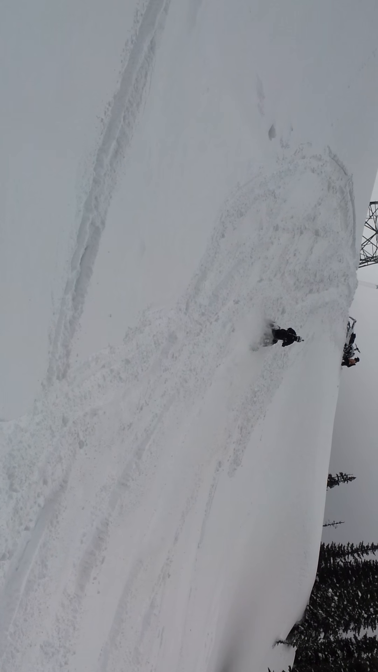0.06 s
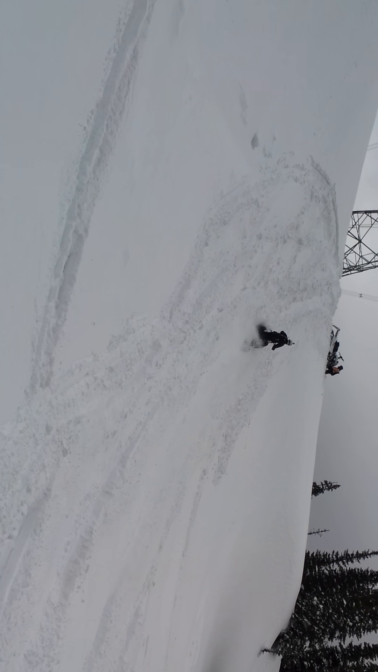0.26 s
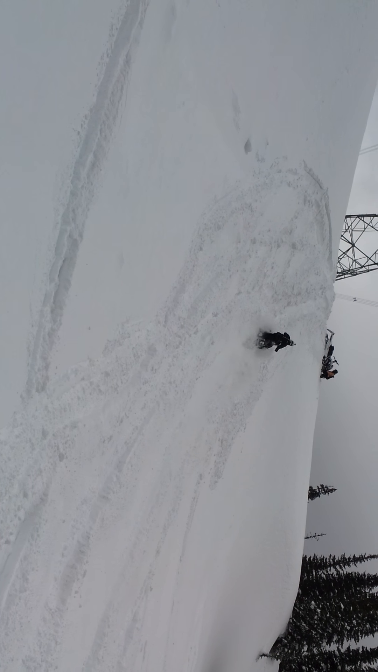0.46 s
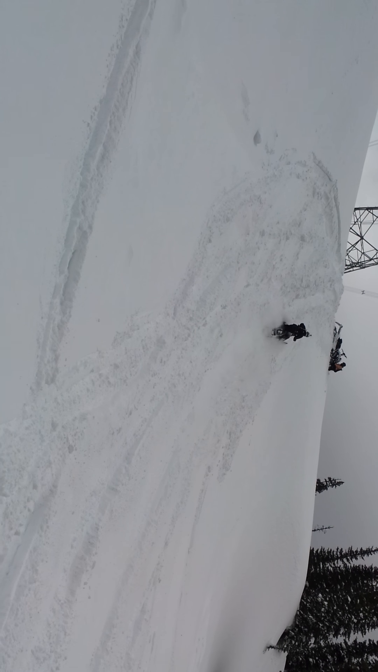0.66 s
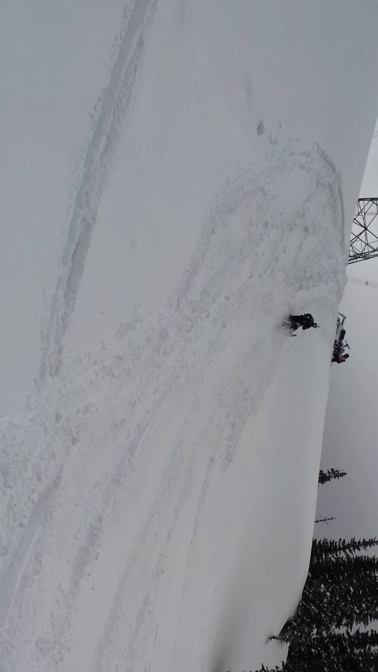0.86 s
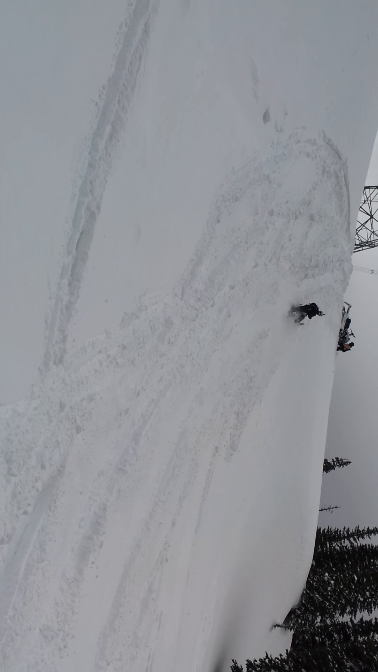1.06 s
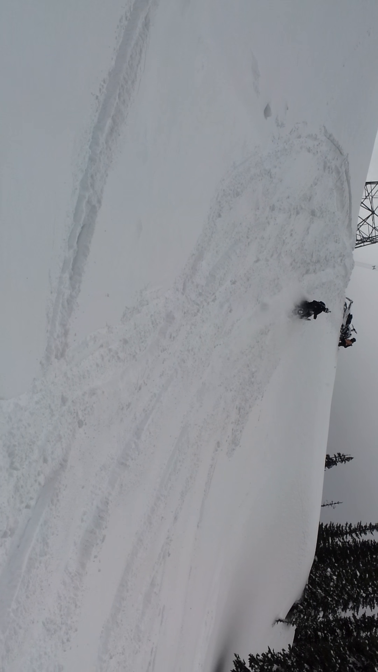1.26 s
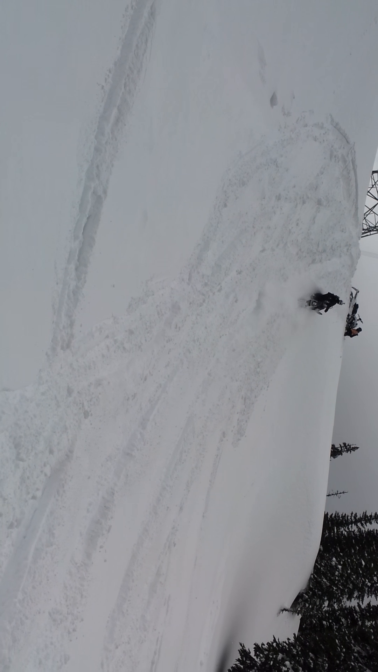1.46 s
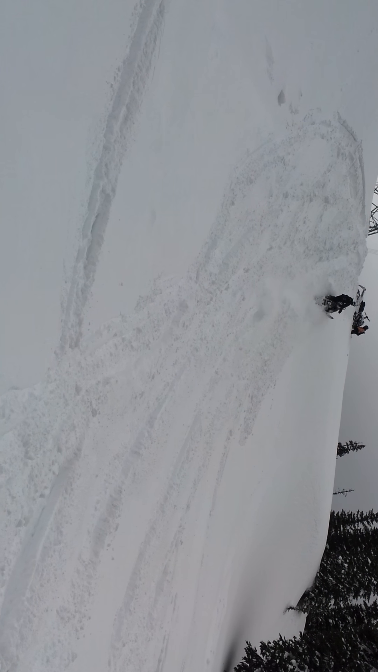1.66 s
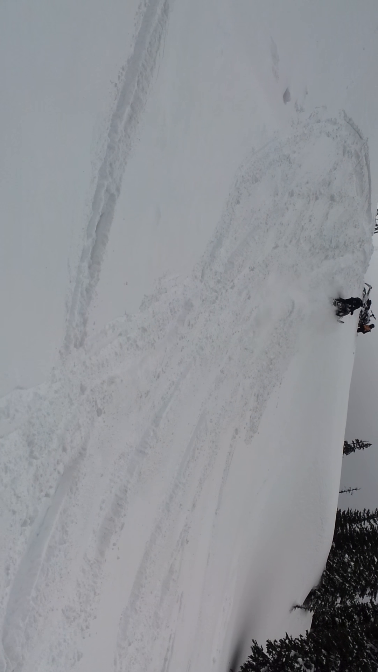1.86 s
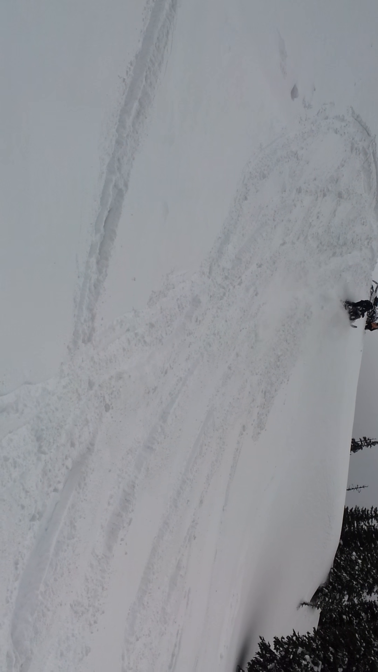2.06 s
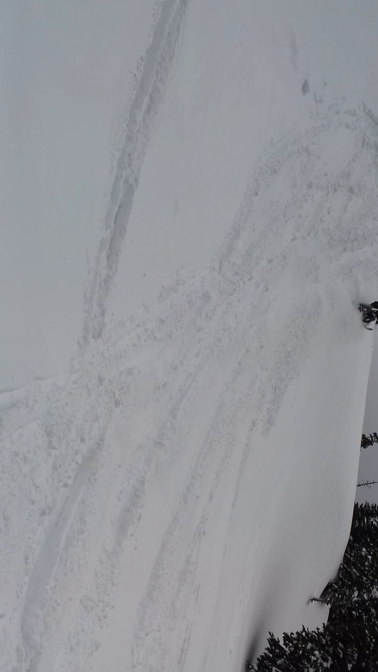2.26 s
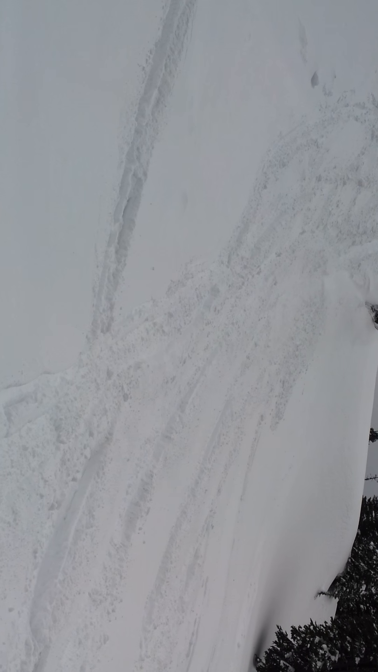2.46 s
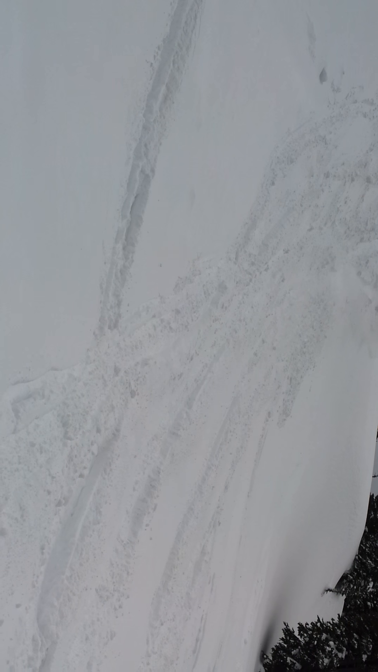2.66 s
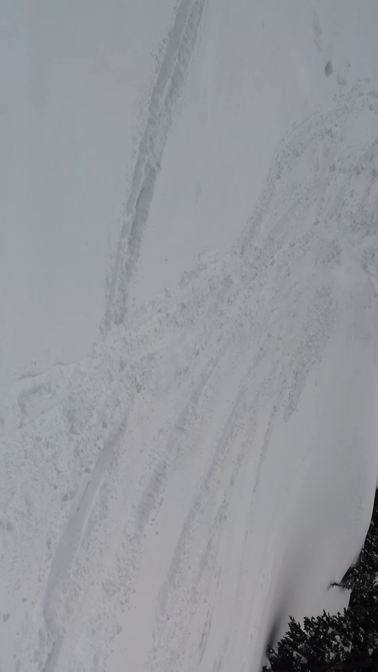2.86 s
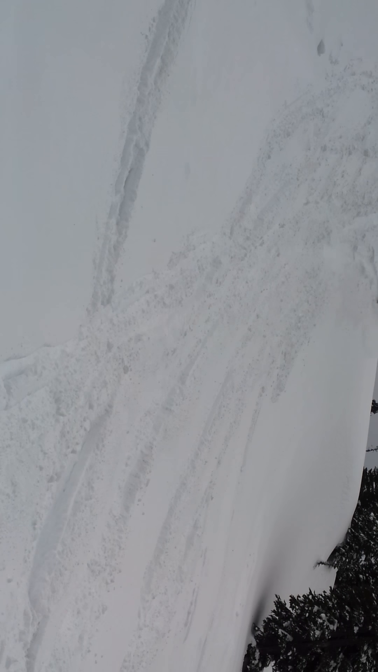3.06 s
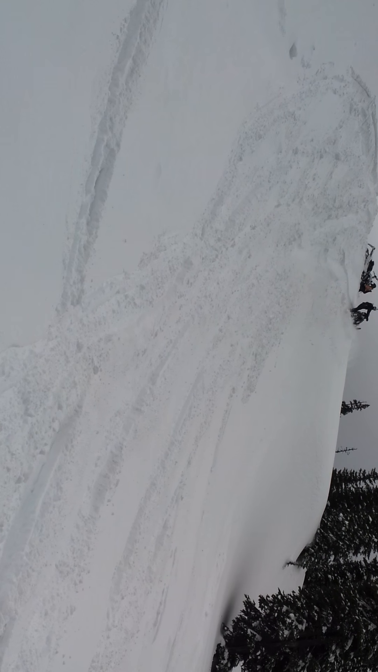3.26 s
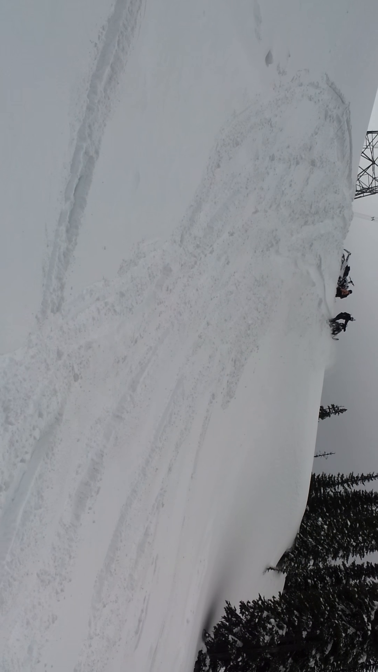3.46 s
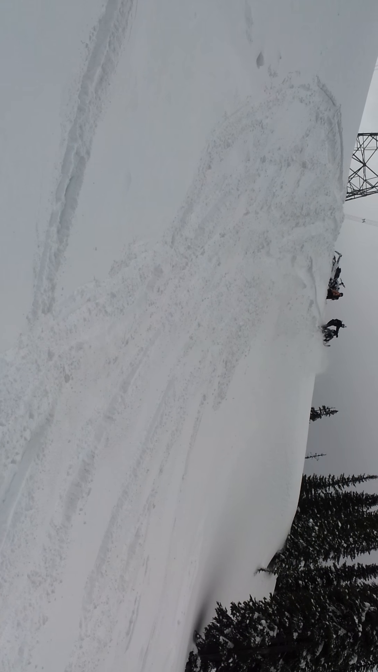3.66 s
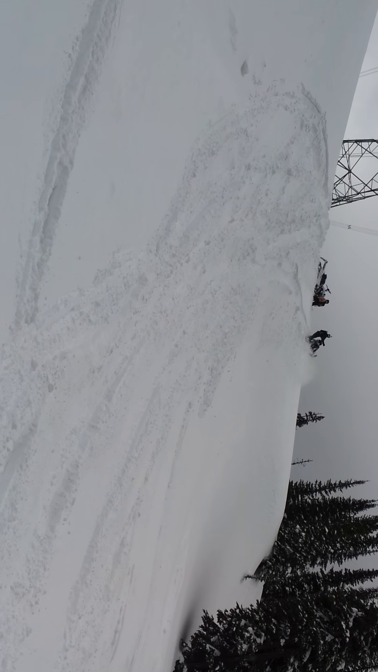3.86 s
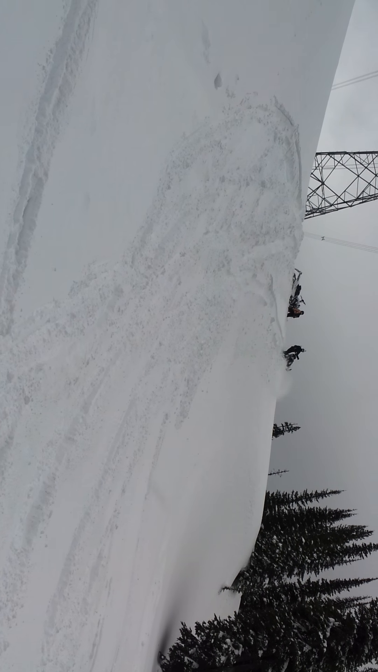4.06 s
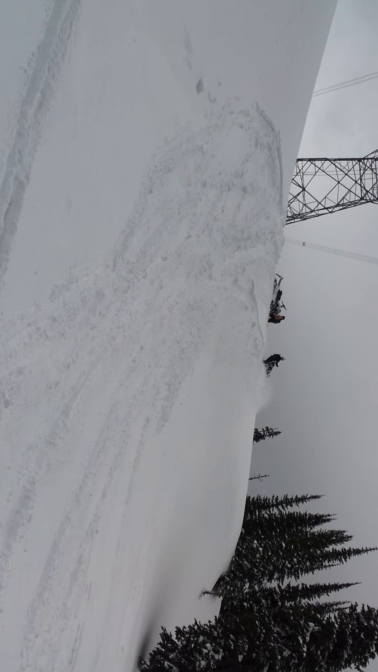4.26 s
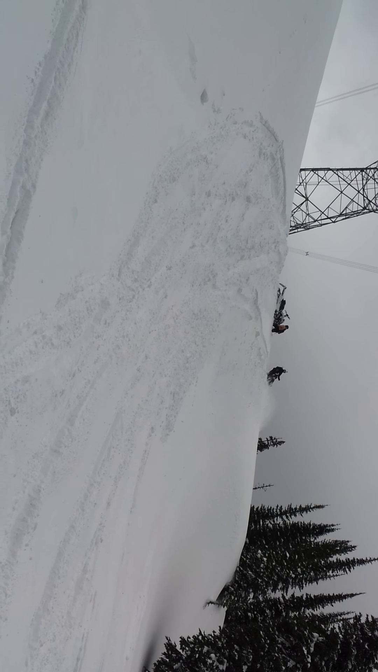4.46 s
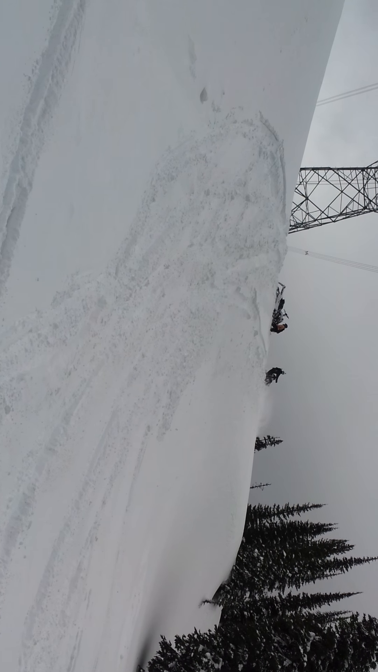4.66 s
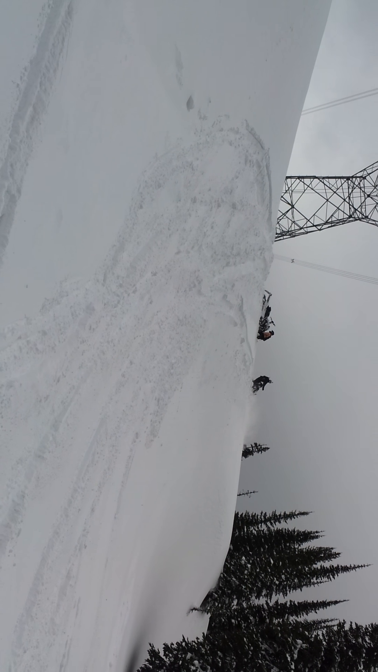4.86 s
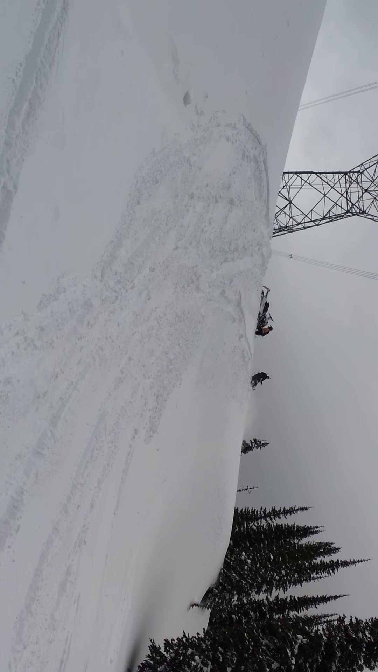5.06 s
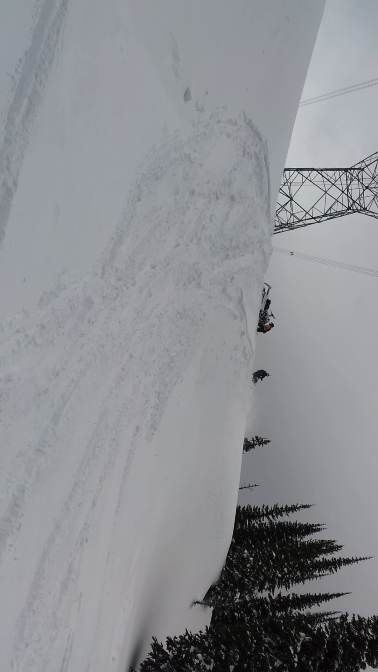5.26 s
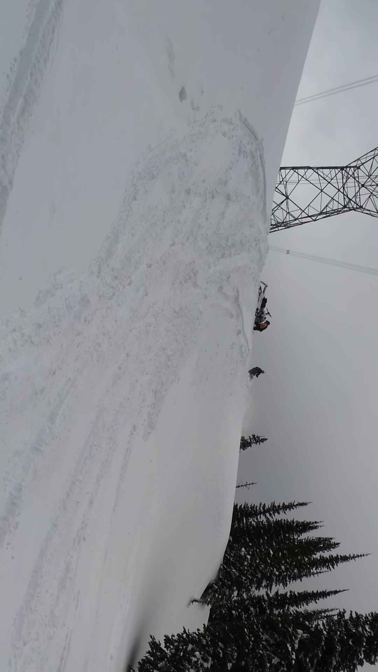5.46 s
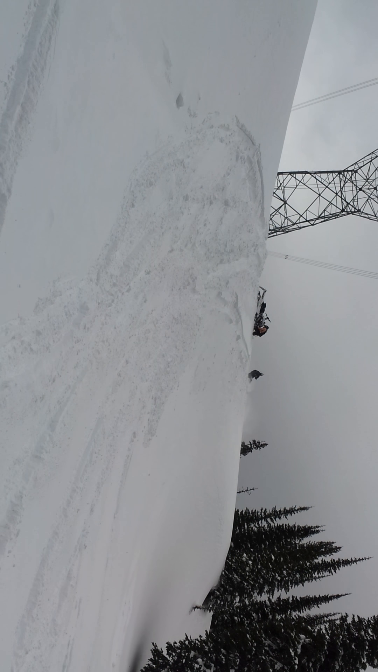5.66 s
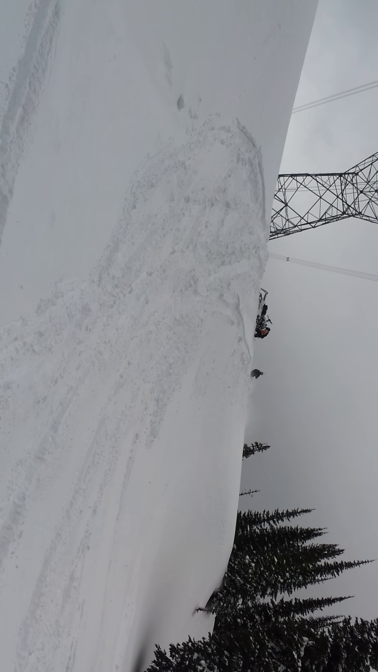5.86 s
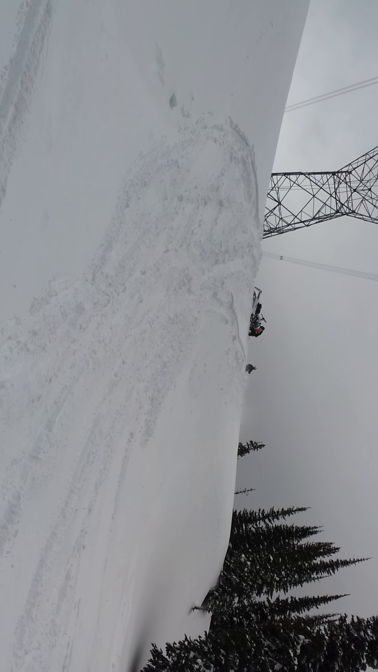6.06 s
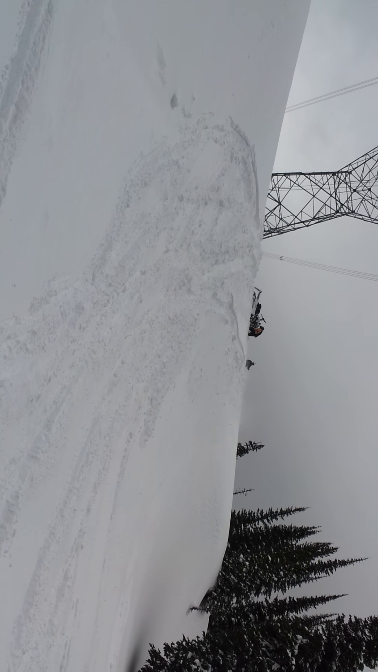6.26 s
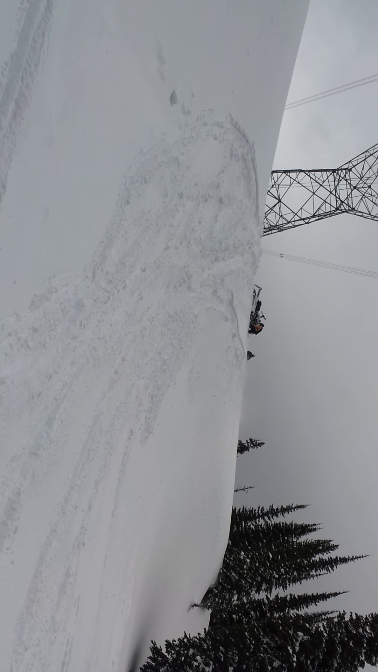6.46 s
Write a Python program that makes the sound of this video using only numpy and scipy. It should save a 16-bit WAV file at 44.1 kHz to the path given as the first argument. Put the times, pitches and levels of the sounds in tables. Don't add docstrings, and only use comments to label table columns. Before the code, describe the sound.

A high-revving snowmobile buzzes and roars as it climbs away from a handheld microphone. Loud, rough swells with hissing snow and a humming track fill the first three seconds; afterwards the note thins, flutters and sinks into distance, trailed by its hillside reflection. Underneath sit a steady low idle from a nearby parked machine and lumpy wind buffeting, heaviest at the start.

```python
import sys
import numpy as np
from scipy import signal
from scipy.fft import rfft, irfft, next_fast_len
from scipy.io import wavfile
from scipy.ndimage import uniform_filter1d, map_coordinates

SR = 44100
rng = np.random.default_rng(int(sys.argv[2]) if len(sys.argv) > 2 else 0)


def attenuation_scalar(level_db):
    decades = np.asarray(level_db, float) / 20
    return 10 ** decades


def generate_wav(signal):
    frames = np.transpose(np.atleast_2d(signal))
    scaled = np.clip(frames, -1, 1) * 32767
    pcm = np.round(scaled).astype(np.int16)
    wavfile.write(sys.argv[1], SR, pcm)


N = 287532
TIME = np.arange(N) / SR


def unit(x):
    return x / np.sqrt(np.mean(x ** 2) + 1e-20)


def curves(rows):
    s, *columns = np.transpose(rows)
    return [np.interp(TIME, s, column) for column in columns]


def wobble(rate):
    return map_coordinates(rng.standard_normal(int(N * rate / SR) + 4), [TIME * rate])


def coloured(x, spectrum):
    size = next_fast_len(N + 8192)
    f, db = np.transpose(spectrum)
    gain = attenuation_scalar(np.interp(np.log(np.fft.rfftfreq(size, 1 / SR) + 1), np.log(f + 1), db))
    return irfft(rfft(x, size) * gain, size)[:N]


def patchy(depth_db):
    z = signal.stft(rng.standard_normal(N), nperseg=512)[2]
    field = uniform_filter1d(rng.standard_normal(z.shape), size=5, axis=0)
    field = uniform_filter1d(field, size=12, axis=1)
    return signal.istft(z * attenuation_scalar(depth_db * unit(field)), nperseg=512)[1][:N]


def partial(phase, order, db, flutter_db, smear):
    shake_db = flutter_db * (wobble(5) + 1.09 * wobble(22.156))
    shake_phase = smear * (wobble(8) + .5 * wobble(40))
    lag = 0.057 * order ** 2
    return np.sqrt(2) * attenuation_scalar(db + shake_db) * np.cos(order * phase - lag + shake_phase)


# (t/s, level/dB)
LOUDNESS = [(0.0, -29), (0.45, -39.5), (0.89, -31.5), (1.13, -29.5), (1.41, -37), (1.85, -30),
            (2.29, -37.5), (2.61, -28.5), (2.77, -28.5), (3.05, -32), (3.33, -38.5), (3.97, -35),
            (4.37, -35.5), (4.89, -43.5), (5.09, -43.5), (5.33, -38.5), (5.81, -48), (6.52, -49.5)]
# (t/s, hiss of snow spray level/dB, rasp of the gas jet level/dB)
RUSH = [(0.0, -47, -42.5), (0.69, -52, -47), (1.01, -42.5, -38), (1.27, -52, -44.5), (1.52, -55.5, -47),
        (1.92, -49, -44), (2.36, -52, -46.5), (2.91, -43, -40), (3.32, -54, -47), (3.63, -55, -46.5),
        (3.9, -53.5, -45), (4.23, -54.5, -42), (4.38, -47.5, -44), (4.52, -56.5, -50.5), (4.79, -60, -51.5),
        (5.28, -59, -51.5), (5.72, -63.5, -56), (6.52, -64.5, -60)]


def snowmobile():
    hz = firing_hz()
    phase = 2 * np.pi * np.cumsum(hz * (1 + .0012 * wobble(30))) / SR
    loud_db, = curves(LOUDNESS)
    hiss_db, rasp_db = curves(RUSH)
    note = exhaust_note(phase, hz, loud_db, rasp_db)
    return note + gas_roar(phase, loud_db, rasp_db) + snow_spray(phase, hiss_db)


# (t/s, firing rate f/Hz)
SPEED = [(0.0, 250), (0.35, 253.7), (0.74, 244.8), (1.09, 269.5), (1.31, 232.4), (1.56, 230.9),
         (1.93, 267.6), (2.37, 264.5), (2.73, 271.4), (3.01, 268.3), (3.34, 244.3), (3.84, 240.1),
         (4.51, 250.3), (4.85, 232.8), (5.37, 262.6), (5.75, 247.9), (6.3, 245.4), (6.52, 238.5)]


def firing_hz():
    return uniform_filter1d(curves(SPEED)[0], size=round(.14 * SR), mode="nearest")


# (firing order, level/dB over the loudness)
ORDERS = [(1.0, 2), (1.5, -6.5), (2.0, 8), (2.5, -11), (3.0, -2.2), (3.5, -8.5), (4.0, 2.5), (4.5, -3),
          (5.0, 11), (6.0, 3.5), (7.0, -2.6), (8.0, -2.65), (9.0, -8)]
# (firing order, level/dB over the rasp)
TOP_ORDERS = [(10, -1), (11, -8), (12, -13), (13, -18), (14, -20), (15, -22), (16, -24)]
# (firing order, level/dB above the mean of firing orders 6 and 3.5, less 6)
UNEVEN = [(.5, -1.5), (5.5, -26), (6.5, -16.5), (7.5, -15.5), (8.5, -27.5), (9.5, -17.5), (10.5, -32)]


def exhaust_note(phase, hz, loud_db, rasp_db):
    level = {k: heard_db(k, db, hz, loud_db) for k, db in ORDERS}
    tone = sum(partial(phase, k, db, flutter_db=1.4, smear=.32) for k, db in level.items())
    top_db = rasp_db + 0.28 * (loud_db + 34.5)
    tone += sum(partial(phase, k, top_db + db, flutter_db=2.5, smear=1.5) for k, db in TOP_ORDERS)
    uneven_db = (level[6] + level[3.5]) / 2 - 6
    tone += sum(partial(phase, k, uneven_db + db, flutter_db=1.8, smear=.45) for k, db in UNEVEN)
    return tone


# (t/s, extra path/ms, strength 0-1)
BOUNCE = [
    (0, 0.31, 0.8),
    (0.5, 0.82, 0.93),
    (1.4, 0.84, 0),
    (2.1, 1.46, 0.82),
    (2.8, 1.577, 0.95),
    (3.6, 1.9, 0),
    (4.3, 1.93, 0.66),
    (5, 2.41, 0.1),
    (6.52, 3.62, 0.45),
]
SNOW_HZ = 1424
# (t/s, length/s, firing order, level/dB)
SWELLS = [(0.132, 0.18, 5.0, 3.5), (0.372, 0.38, 1.5, 10.5), (0.501, 0.57, 3.5, 12), (0.59, 0.14, 8.0, -21),
          (0.983, 0.22, 1.5, -8), (1.41, 0.18, 1.0, 9), (1.511, 0.31, 1.5, 14.5), (1.665, 0.54, 5.0, -6.5),
          (1.906, 0.17, 2.0, -18), (2.28, 0.36, 1.5, 8), (2.309, 0.16, 4.0, -7.7), (2.324, 0.31, 3.5, 10.5),
          (2.439, 0.26, 3.0, -7.5), (2.481, 0.11, 1.0, -5.5), (2.746, 0.63, 2.0, -15),
          (3.302, 0.61, 5.0, -8), (3.511, 1.5, 8.0, 10.5), (3.527, 0.55, 4.0, -8.5), (3.605, 0.9, 3.0, 9.5),
          (3.975, 1.06, 1.0, -4.5), (4.089, 0.72, 1.5, -19), (4.155, 0.51, 3.5, -6),
          (4.298, 0.92, 9.0, 9.5), (4.342, 0.23, 3.0, -2), (4.38, 0.33, 6.0, 13.5), (4.94, 0.39, 7.0, 11.5),
          (5.354, 0.72, 2.0, -6.5), (5.457, 0.79, 9.0, 8.5), (5.474, 0.51, 1.5, -18), (5.827, 1.6, 3.0, 7),
          (0.142, 0.085, 1, 12), (0.22, 0.21, 2, -10), (0.339, 0.095, 5, -12), (0.565, 0.22, 6, -21),
         (.8, 0.22, 5, 4.5), (0.803, 0.73, 3, 1.5), (1.027, .18, 5, -12), (1.148, 0.071, 8, 10.5),
         (1.326, .12, 2, 6), (1.424, 0.78, 6, 2), (1.513, .18, 4, -10.5), (1.875, .94, 3, 3),
         (2.8, 0.32, 3, 1.5), (2.24, 0.13, 5, -1.5), (2.802, .5, 1, 1.5), (1.795, 0.11, 5, 3.5),
         (1.3, 0.3, 3, 3.5), (.8, .2, 4, 3), (5.999, 0.46, 2, 2.5), (1.5, .4, 2.5, 6), (3.04, .16, 1, 6),
         (3.244, 0.19, 8, -10), (3.252, .16, 1, -11), (3.81, .38, 6, 4.5), (3.794, 0.27, 7, 3.5),
         (4.206, 0.14, 5, 4), (4.365, 0.61, 2, -11), (4.457, 0.14, 1, 7.5), (5.65, 0.3, 2, -4)]


def heard_db(order, db, hz, loud_db):
    t, f = TIME[::64], order * hz[::64]
    path_ms, strength = (column[::64] for column in curves(BOUNCE))
    back = np.clip(strength, 0, .93) / (1 + (f / SNOW_HZ) ** 2)
    turn = 2 * np.pi * f * path_ms / 1000
    change_db = 10 * np.log10(1 + back ** 2 - 2 * back * np.cos(turn))
    for s, length, k, gain_db in SWELLS:
        if k == order:
            change_db += gain_db * 16. ** -((t - s) / length) ** 2
    return loud_db + db + np.interp(TIME, t, change_db)


def off_the_snow(x):
    path_ms, strength = curves(BOUNCE)
    dull = coloured(x, [(100, 0), (SNOW_HZ / 2, -2), (SNOW_HZ, -6), (2 * SNOW_HZ, -14), (8000, -30)])
    late = np.interp(TIME - path_ms / 1000, TIME, dull)
    return x - .85 * np.clip(strength, 0, .93) * late


# (f/Hz, level/dB per Hz)
ROAR_COLOUR = [(60, -28.5), (200, -7.5), (400, -4), (620, -6.5), (900, -6), (1400, -1), (2000, -6.5),
               (2600, -13.5), (3300, -22.5), (4300, -34), (6000, -36), (9000, -84)]
# (f/Hz, level/dB)
FAR_COLOUR = [(250, -3), (450, -5), (1200, -3), (2500, 0), (4000, -2.5)]


def gas_roar(phase, loud_db, rasp_db):
    near = unit(coloured((1 + 0.1 * np.cos(phase)) * patchy(depth_db=2.0), ROAR_COLOUR))
    far = (TIME / TIME[-1]) ** 2
    roar = off_the_snow((1 - far) * near + far * coloured(near, FAR_COLOUR))
    roar_db = -28.5 + 0.53 * (rasp_db + 46.5) + 0.22 * (loud_db + 36.5)
    return attenuation_scalar(roar_db) * roar


# (f/Hz, level/dB per Hz)
HISS_COLOUR = [(2240, -36), (3800, -4), (4360, -6), (5430, 4.5), (5970, 4.5), (6930, -1.5), (7930, -14.5),
               (10300, -52), (17400, -120)]


def snow_spray(phase, hiss_db):
    hiss = unit(coloured((1 + 0.092 * np.cos(phase)) * patchy(depth_db=2.5), HISS_COLOUR))
    return attenuation_scalar(hiss_db + 2.8 + 0.62 * wobble(7.8)) * hiss


def hillside(x):
    delay_s = .215 - .016 * TIME
    rise_db = np.interp(TIME, [0, 4.3, 4.6, 5, 5.45, 5.9], [-14, -13, -7, -12, -10, -3])
    late = np.interp(TIME - delay_s, TIME, x, left=0) * attenuation_scalar(rise_db + 0.99 * wobble(7.5))
    return coloured(late, [(150, -18), (300, -10), (500, 0), (1300, 0), (1800, -6), (3000, -18)])


# (t/s, rate over the firing rate, level/dB)
TRACK = [
    (0, 1.04, -44),
    (.9, .99, -24),
    (1.1, 1.15, -33.5),
    (1.22, 1.08, -30),
    (1.5, 0.9, -40.5),
    (2, 0.99, -25.5),
    (2.35, .945, -29.5),
    (3.1, 0.97, -41),
    (6.52, .96, -45),
]


def track():
    share, db = curves(TRACK)
    share = uniform_filter1d(share, size=SR // 10)
    phase = 2 * np.pi * np.cumsum(share * firing_hz()) / SR
    return partial(phase, order=1, db=db, flutter_db=2.5, smear=0.084)


# (order of its firing rate, level/dB)
IDLE = [(2, -59), (2.5, -44.5), (3, -31.5), (3.4, -38), (4, -37), (4.5, -61), (5, -37), (5.5, -43.5),
        (6, -49), (7, -49.5), (8, -55), (9, -60.5)]


def parked_engine():
    idle_hz = 22.21
    phase = 2 * np.pi * np.cumsum(idle_hz * (1 + 0.003 * wobble(1.5))) / SR
    return sum(partial(phase, k, db, flutter_db=1.2, smear=.45) for k, db in IDLE)


# (t/s, level/dB)
WIND = [
    (0, -31.5),
    (.7, -36.5),
    (1.25, -44.5),
    (2.1, -45.5),
    (3.1, -50),
    (3.5, -40),
    (4.8, -44),
    (6.52, -41),
]
# (f/Hz, level/dB per Hz)
WIND_COLOUR = [(13, -47.5), (22, -18.5), (50, -5.5), (81, -4), (116, -3.5), (188, -11), (246, -8.5),
               (303, -18.5), (400, -25), (520, -63.5), (880, -120)]
# (t/s, peak level/dB, f/Hz)
THUMPS = [(0.297, -13, 104), (0.538, -14.5, 146), (0.631, -20.5, 144), (0.961, -16, 137),
          (1.201, -27.5, 127), (3.979, -23.5, 142), (4.172, -16.5, 144), (4.449, -27.5, 132),
          (5.12, -23.5, 141), (5.787, -27, 140.4), (6.248, -28, 146)]


def wind():
    lumps = attenuation_scalar(1.5 * wobble(14))
    rumble = unit(lumps * coloured(rng.standard_normal(N), WIND_COLOUR))
    gusts = sum(attenuation_scalar(db - 20) * np.exp(-((TIME - s) / 0.053) ** 2) for s, db, hz in THUMPS)
    air = attenuation_scalar(5.5) * (attenuation_scalar(curves(WIND)[0]) + gusts) * rumble
    for s, db, hz in THUMPS:
        cycles = (TIME - s - .015) * hz
        air += attenuation_scalar(db + 5.5) * np.cos(2 * np.pi * cycles) * np.exp(-(cycles / 0.33) ** 2)
    return air


def scene():
    sled = snowmobile()
    return (sled + hillside(sled) + track() + parked_engine() + wind())[None]


def low_pass(x):
    return signal.sosfilt(signal.butter(12, 17200, fs=SR, output="sos"), x)


def record(dry):
    soft = dry[0] / (1 + np.abs(dry[0] / 1.3) ** 4) ** (1 / 4)
    soft += attenuation_scalar(-61.0) * rng.standard_normal(N)
    soft *= np.clip(np.minimum(TIME, TIME[::-1]) / .002, 0, 1)
    mic = coloured(soft, [(20, -44.0), (40, -10), (60, -1), (17100, -1.5), (17300, -62)])
    return low_pass(mic)


dry = scene()
out = record(dry)
generate_wav(out)
```